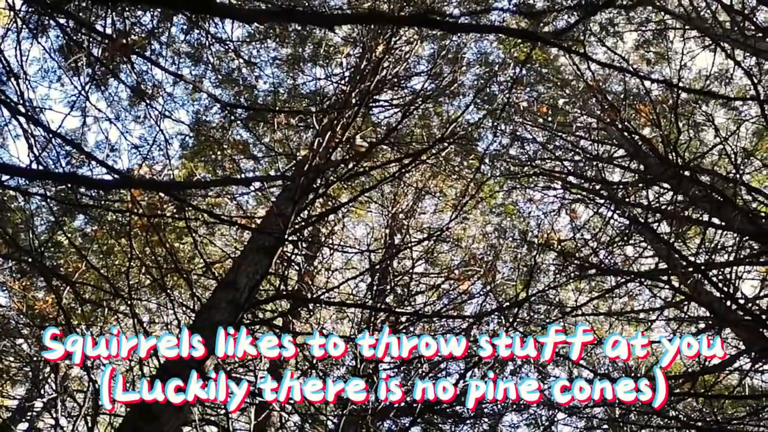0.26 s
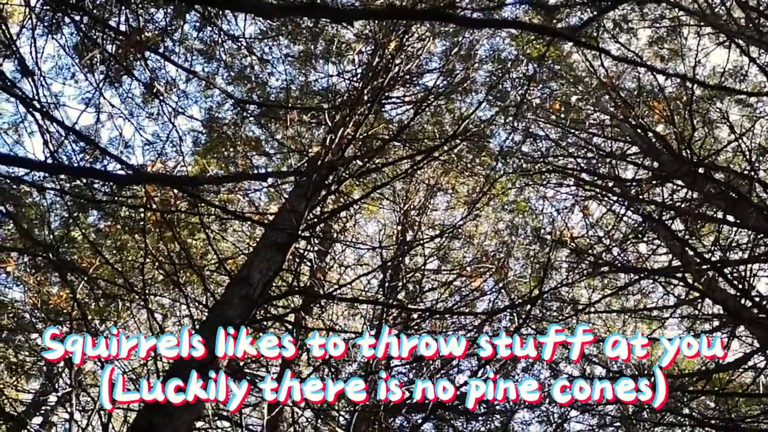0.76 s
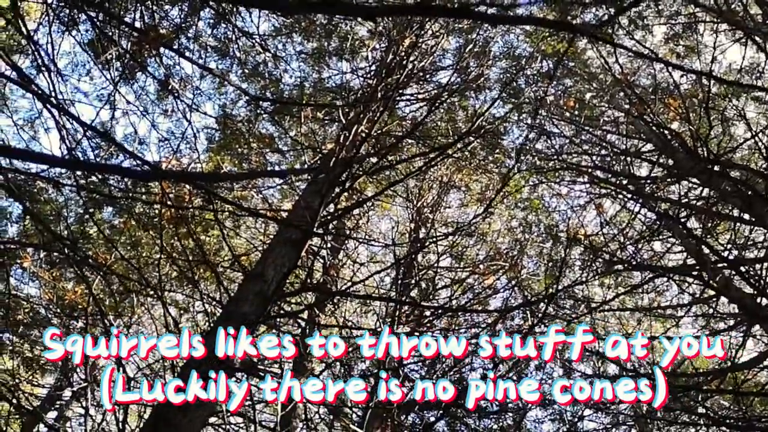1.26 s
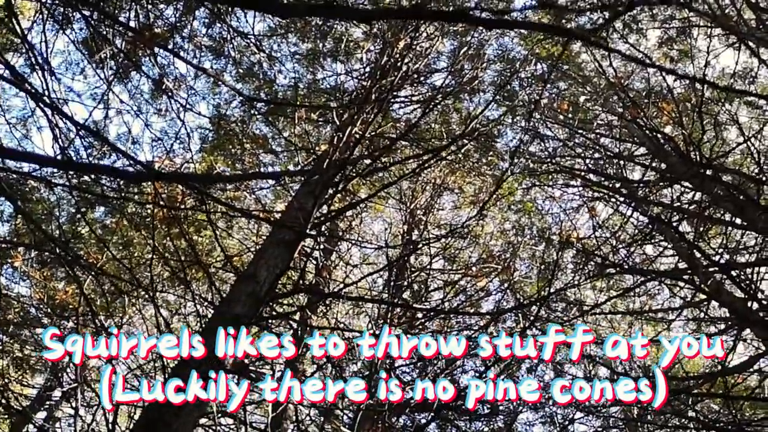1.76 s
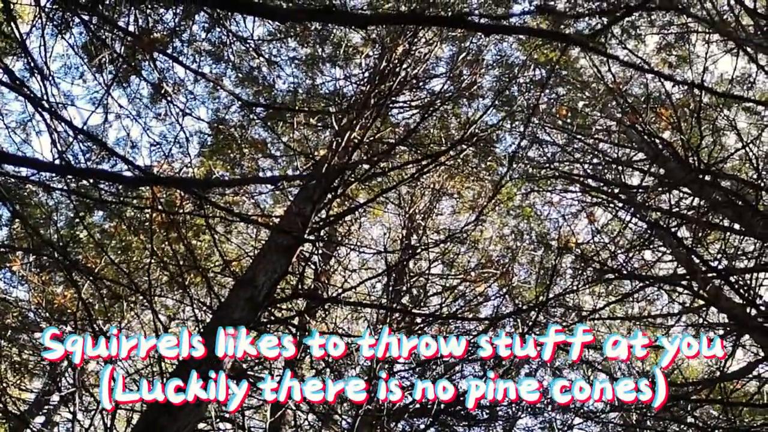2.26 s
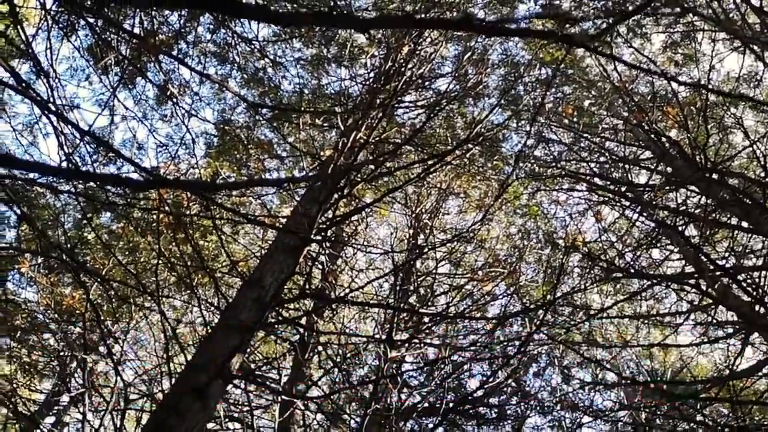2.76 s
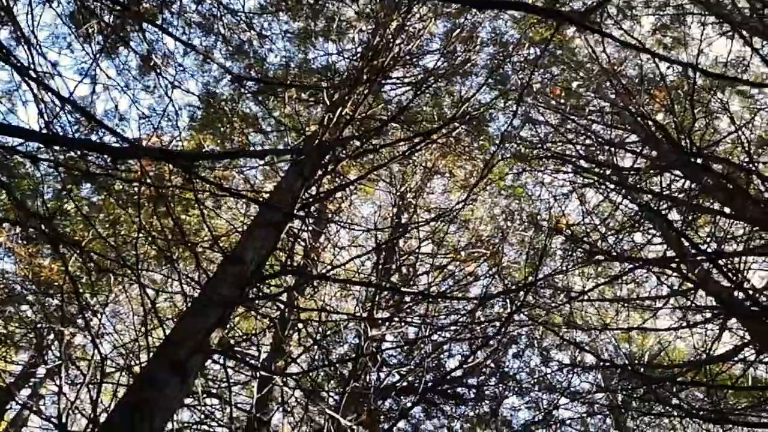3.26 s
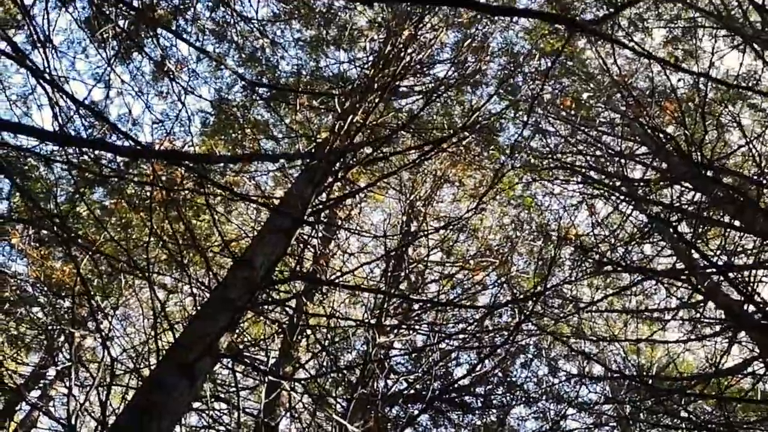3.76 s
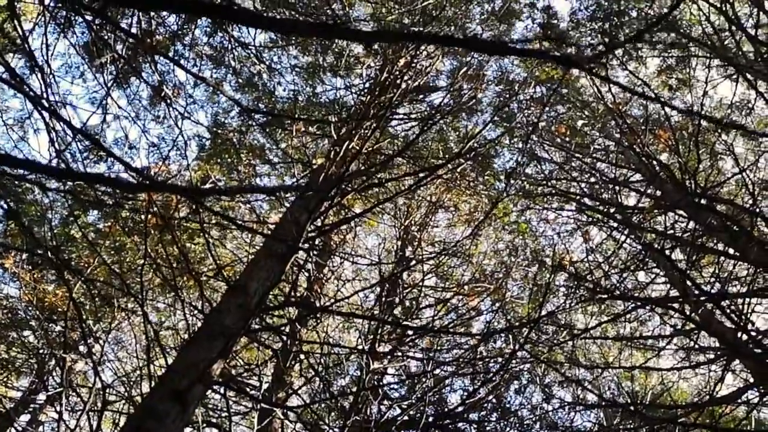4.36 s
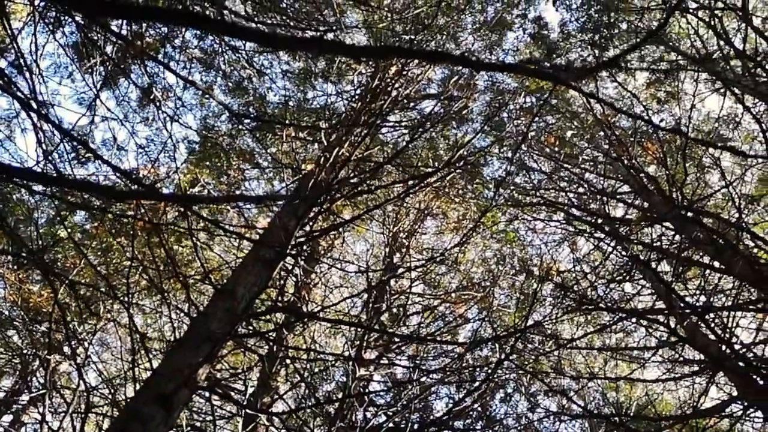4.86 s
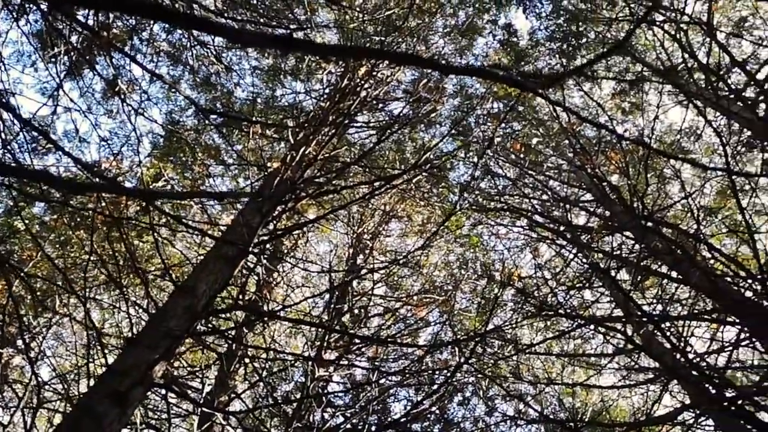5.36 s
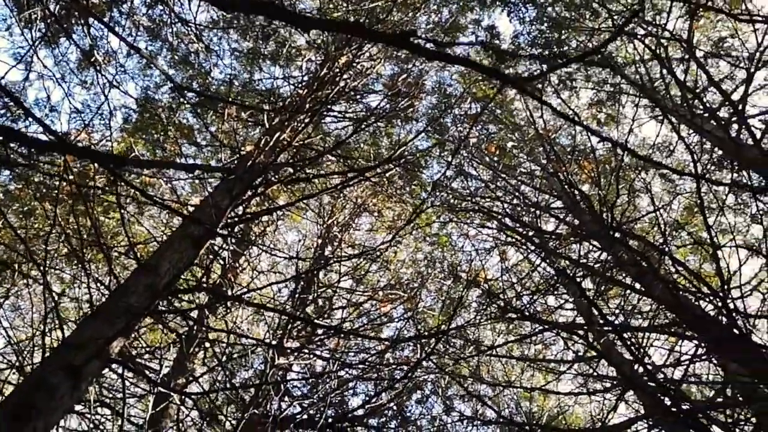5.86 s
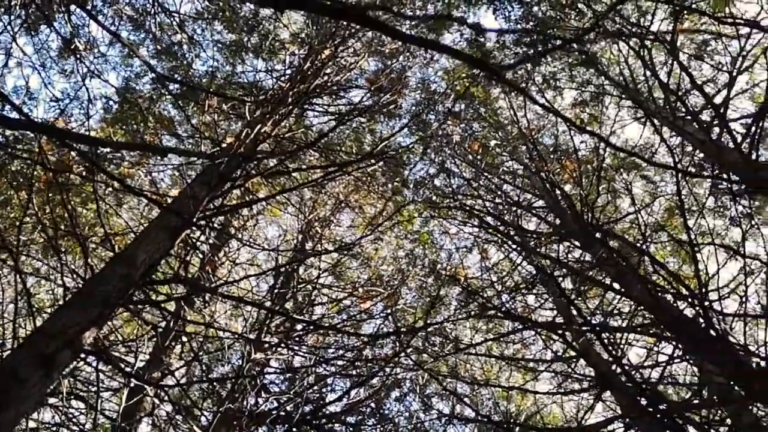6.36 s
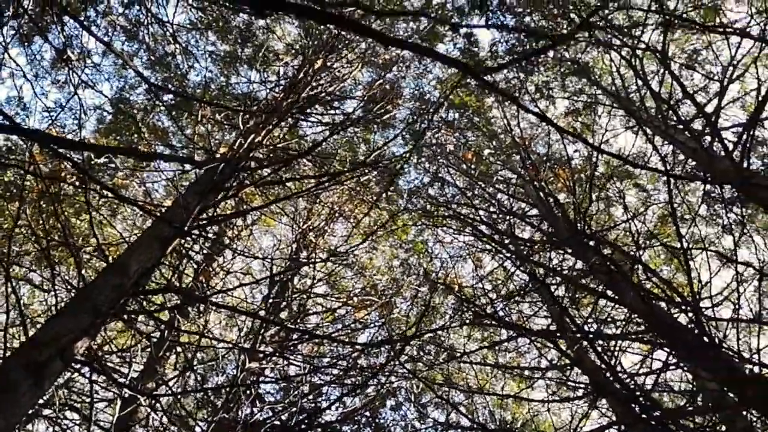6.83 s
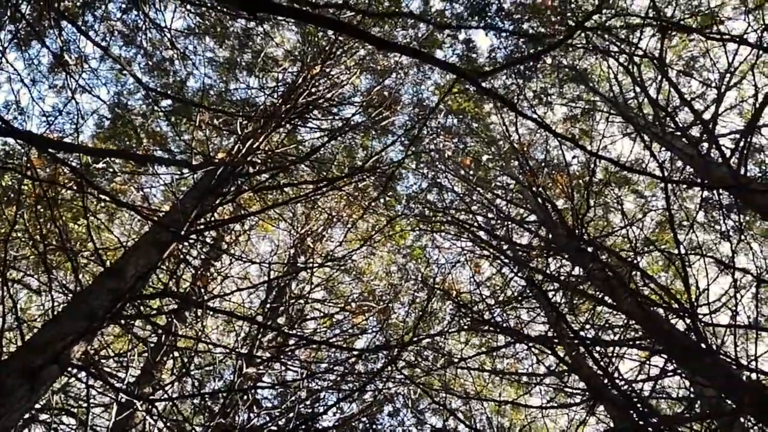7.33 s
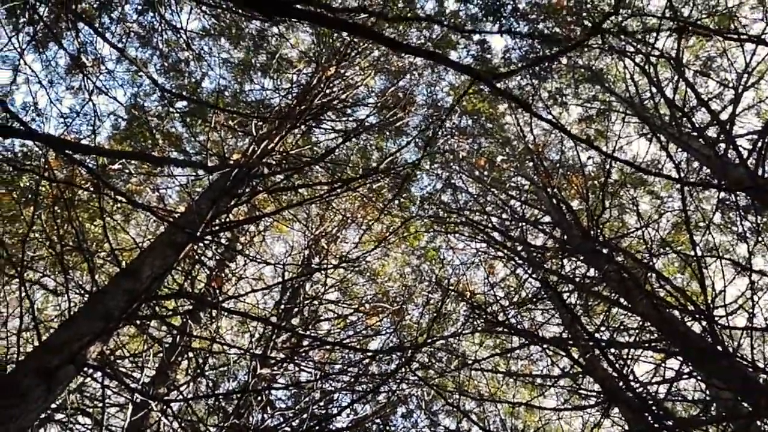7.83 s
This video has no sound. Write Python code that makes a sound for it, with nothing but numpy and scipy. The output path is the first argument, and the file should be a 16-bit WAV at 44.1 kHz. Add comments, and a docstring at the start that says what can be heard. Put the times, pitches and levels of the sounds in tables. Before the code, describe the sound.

A pine forest rushes softly for the whole eight seconds, while wind and fingers on a hand-held microphone make a low, uneven rumble with dull bumps and small knocks. Right at the start a distant squirrel gives a short, high chirp and a nearer one joins in faintly, both on the left. At about 0.5 seconds the near one lets out a brief, trembling squeal that ends in a hiss, the loudest call. The far squirrel chirps on from 1 second, and from about 1.8 seconds the two trade sharp chirps, roughly two to four a second, each flicking up and down in pitch with a short echo among the trees. The rumble swells around 3 seconds and again just after 6. Between about 5.7 and 7.2 seconds a few twigs tick faintly. The near squirrel stops near 6.8 seconds, and the far one chirps last, just before 8.

```python
"""From the start, a pine forest rushes softly while air and fingers make a hand-held camera rumble and
knock. A far squirrel chirps, a near one joins in and, about half a second in, lets out one loud squeal
that ends in a hiss. Then the near one scolds and the far one answers, in short chirps that rise and fall
in pitch. Trunks and treetops scatter each call into a short tail. From about 5.7 s a few twigs tick,
and the far squirrel has the last chirp."""
import sys
import numpy as np
from scipy import signal
from scipy.fft import rfft, irfft, next_fast_len
from scipy.io import wavfile
from scipy.ndimage import map_coordinates

SR = 44100
rng = np.random.default_rng(int(sys.argv[2]) if len(sys.argv) > 2 else 0)


def pcm_store(signal):
    """Save signal as 16-bit PCM."""
    levels = np.round(np.clip(np.atleast_2d(signal), -1, 1) * 32767)
    wavfile.write(sys.argv[1], SR, levels.astype(np.int16).T)


N = 356769
T = np.arange(N) / SR

# Levels in the tables are relative: the functions turn each layer up or down.
# slow changes of the breeze in the treetops (time [s], level [dB])
BREEZE = [(0.0, -50), (2.84, -50), (3.04, -49), (4.03, -50), (7.57, -49), (7.8, -53), (8.09, -52)]
# short gusts (middle [s], half length [s], rise [dB])
GUSTS = [(0.538, 0.11, 3.5), (2.85, 0.092, 2.5), (3.033, 0.067, 2.5), (3.237, 0.08, 3), (3.609, 0.076, 3),
         (4.946, 0.037, 1.5), (5.121, 0.053, 4), (5.328, .045, 4), (5.74, 0.038, 3.5)]
# tone colour of the forest's rush (frequency [Hz], level [dB])
RUSH_COLOUR = [(100, -9), (250, 1.5), (450, -0.5), (650, -2.5), (900, 0.5), (1150, -2.5), (1400, -6),
               (1700, -4.5), (2300, -10), (3200, -20), (5000, -21), (9000, -34)]
# how much of the rush both sides have in common (frequency [Hz], share [0-1])
RUSH_SHARED = [(150, 0.41), (300, 0.56), (550, 0.785), (1000, 0.81), (2000, 0.334), (4000, 0.19)]
# how far the left side's wave runs ahead (frequency [Hz], lead [radians])
RUSH_LEFT_LEAD = [(100, -6), (260, 1.68), (520, 3), (860, 4), (1640, 6.5), (2240, 8.5), (4000, 14.5)]
# how much louder the rush is on the left (frequency [Hz], left minus right [dB])
RUSH_BALANCE = [(200, -5), (380, 3.5), (700, 7), (1290, 10), (2380, 1), (4400, -1)]
# tone colour of the hiss in the pine needles (frequency [Hz], level [dB])
NEEDLE_COLOUR = [(800, -19.5), (2500, 12.5), (4500, 1.5), (6000, 4.5), (7500, 1.5), (9000, -1),
                 (12000, -1.5), (15700, -2)]
# faint far tones (middle [s], half length [s], pitch [Hz], level [dB])
HOOTS = [(1.31, 0.246, 1130, -56), (2.083, 0.115, 1105, -54)]

# strength of the air on the camera (time [s], level [dB])
WIND = [(0, -30), (.12, -24.5), (.33, -30), (.7, -27.5), (1.3, -30), (2.45, -30.5), (2.78, -24),
        (3.3, -21.5), (3.68, -28.5), (3.78, -34), (3.95, -26.5), (5.3, -27), (6.0, -26.5), (6.35, -23.5),
        (7.0, -28), (7.35, -26.5), (7.9, -31)]
# tone colour of the camera's deep sway (frequency [Hz], level [dB])
SWAY_COLOUR = [(5, -13), (12, 8), (23, -1), (57, -6.5), (78, -12), (110, -48), (140, -69.5), (240, -120)]
# tone colour of the higher rumble of the grip (frequency [Hz], level [dB])
GRIP_COLOUR = [(40, -25), (70, 5.5), (110, 0), (160, -11), (250, -22), (400, -32), (700, -44), (1500, -79)]
# jolts of the hand (time [s], level [dB], pitch [Hz])
JOLTS = [(0.246, -17, 93), (1.098, -11.5, 55.5), (2.16, -22.5, 96), (2.73, -15, 86.5), (2.874, -12, 49),
         (4.26, -17.5, 70), (4.89, -22, 90), (5.10, -18, 89.6), (5.29, -15.5, 44.3), (5.733, -12, 48),
         (6.199, -9.5, 41.4), (6.501, -14, 55)]
# fingers knocking on the case (time [s], level [dB])
KNOCKS = [(0.255, -34.5), (1.304, -38), (2.161, -30.5), (2.827, -32), (2.864, -35), (3.208, -38.5),
          (4.033, -34.5), (4.22, -33), (4.368, -37), (4.705, -32.5), (4.884, -31), (5.062, -33),
          (5.109, -30.5), (5.31, -38), (6.06, -34), (6.133, -37.5), (6.347, -34), (6.428, -29)]
# what the case lets through (frequency [Hz], gain [dB])
CASE_FILTER = [(30, -6), (90, 4), (170, 0.5), (300, 4.5), (480, 6), (750, -15.5), (2000, -45)]

# ticking twigs (time [s], level [dB])
TWIG_TICKS = [(5.6555, -47), (5.909, -37), (6.3856, -34), (6.8715, -33.5), (7.0548, -43), (7.1604, -39)]
# tone colour of a tick (frequency [Hz], level [dB])
TWIG_COLOUR = [(1500, -28), (3300, -13), (5000, -16), (7000, -6), (8500, -2), (9600, -16.5), (11000, -24),
               (15000, -29)]

# what a squirrel's throat lets through (frequency [Hz], gain [dB])
THROAT_FILTER = [(2400, -31), (3400, -37), (4300, 0), (5200, 0.5), (6000, -2), (6900, -11.5), (7600, -14),
                 (8700, -22.5), (9700, -24), (10400, -17.5), (11300, -32.5), (12200, -29.5), (13000, -42),
                 (13800, -58), (15500, -60)]
# tone colour of the breath in a chirp (frequency [Hz], level [dB])
BREATH_COLOUR = [(2500, -24), (3800, -16), (5500, 12), (7000, 4.5), (8400, 1.5), (9800, -22), (12000, -6),
                 (15000, -14.5)]
# Below, "pitch" is the voice's strong second harmonic, at twice its lowest tone.
# chirps of the far squirrel (start [s], length [s], top pitch [Hz], level [dB])
FAR_CHIRPS = [(.127, .02, 6570, -29.5), (1.009, 0.027, 6720, -33.5), (1.448, 0.023, 6690, -33.5),
              (1.851, 0.02, 6685, -29.5), (2.823, 0.035, 6940, -28), (3.150, .03, 6720, -29.5),
              (3.611, 0.022, 6660, -29), (3.970, 0.022, 6570, -35), (4.275, 0.026, 6690, -33),
              (4.577, 0.0226, 6385, -36.5), (4.908, 0.02, 5830, -46), (5.240, 0.018, 6370, -39.5),
              (6.012, .021, 6075, -48), (6.383, 0.0125, 6800, -35), (6.436, .026, 6530, -33),
              (7.163, .022, 6100, -42), (7.398, 0.011, 7000, -36.5), (7.529, 0.0265, 6200, -40.5),
              (7.885, .02, 6420, -37)]
# chirps of the near squirrel (start [s], length [s], top pitch [Hz], level [dB], overtones [dB],
# place of the top in the chirp [0-1], flatness of the arch [1 = straight slopes])
NEAR_CHIRPS = [(.222, 0.036, 5800, -41, -5, 0.4, 2), (.343, 0.029, 5380, -44.5, 1, 0.6, 4),
               (1.770, .068, 6474, -30, -3, .5, 2.1), (2.292, 0.061, 6700, -32.5, -7, 0.63, 3),
               (2.351, .027, 6550, -21.5, 3, .14, 1.25), (2.619, .036, 6030, -36, -3, 0.35, 2.5),
               (2.818, 0.035, 5410, -43, 5, 0.5, 4), (3.244, .055, 6016, -30, 1.5, .52, 3.6),
               (3.517, .025, 4933, -47, -5, 0.5, 2), (3.882, 0.0503, 5920, -32.5, -1.5, .43, 2.4),
               (4.115, 0.0427, 5620, -42, 3.5, .5, 2.9), (4.500, .055, 5675, -36.5, 2, .52, 3.2),
               (5.111, 0.0576, 6470, -26, -11, 0.47, 3.1), (5.469, 0.0515, 6160, -28, -8, .56, 3.1),
               (5.771, 0.042, 6060, -28.5, -5, 0.45, 3.1), (6.745, .06, 6520, -27, -8, .42, 2.7)]
# course of the squeal (time [s], pitch [Hz], level [dB])
SQUEAL = [(.416, 5090, -51), (0.420, 5275, -35), (.447, 5400, -23.5), (0.455, 5638, -18),
          (0.474, 5790, -15), (0.488, 5600, -18.5), (0.513, 5660, -13), (0.519, 5500, -13.5),
          (0.523, 5020, -30), (.528, 4240, -45)]
# the hiss that ends the squeal (time [s], level [dB])
HISS_LEVEL = [(.52, -74), (.531, -47), (.541, -24), (.575, -32.5), (.6, -28), (.64, -40.5), (.72, -58.5),
              (.8, -95)]
# tone colour of that hiss (frequency [Hz], level [dB])
HISS_COLOUR = [(2000, -12), (2800, -2), (4000, -15.5), (6800, -5), (7800, 9), (8800, 2.5), (9800, -15.5),
               (12000, -21.5), (15500, -22.5)]


def amp(db):
    """Turn decibels into a number to multiply by."""
    return 10 ** (np.asarray(db) / 20)


def unit(x):
    """Scale a sound to an average strength (rms) of 1."""
    return x / np.sqrt(np.mean(x ** 2) + 1e-20)


def look_up(table, hz):
    """Read between the rows of a (frequency, value) table, with octaves evenly spaced."""
    frequencies, values = np.transpose(table)
    return np.interp(np.log(hz + 1), np.log(frequencies + 1), values)


def curves(table):
    """Join timed rows with straight lines: one curve for each column after the time."""
    times, *columns = np.transpose(table)
    return [np.interp(T, times, column) for column in columns]


def wobble(rate):
    """A smooth curve through `rate` random values a second."""
    return map_coordinates(rng.standard_normal(int(N * rate / SR) + 4), [T * rate])


def filtered(x, response):
    """Multiply each frequency in a sound by response(hz)."""
    size = next_fast_len(N + SR // 2)
    return irfft(rfft(x, size) * response(np.fft.rfftfreq(size, 1 / SR)), size)[..., :N]


def noise(colour):
    """Noise of strength 1 with the given tone colour."""
    return unit(filtered(rng.standard_normal(N), lambda hz: amp(look_up(colour, hz))))


def fuzzy_tone(hz, width_hz):
    """A tone of strength 1, blurred by random wobbles."""
    phase = 2 * np.pi * hz * T
    return unit(wobble(width_hz) * np.sin(phase) + wobble(width_hz) * np.cos(phase))


def add(track, start, sound):
    """Mix a sound into a track, `start` seconds in."""
    i = max(round(start * SR), 0)
    track[..., i:i + sound.shape[-1]] += sound[..., :N - i]


def gusts():
    """The rise in dB from all gusts; each swells and fades like a bell curve."""
    return sum(db * np.exp(-((T - middle) / half) ** 2) for middle, half, db in GUSTS)


def forest():
    """The breeze makes a distant rush from the left and a fine hiss in the needles."""
    def shared_part(hz):
        right_delay = np.exp(-1j * look_up(RUSH_LEFT_LEAD, hz))
        return np.sqrt(look_up(RUSH_SHARED, hz)) * np.array([np.ones_like(hz), right_delay])

    common, left, right = (noise(RUSH_COLOUR) for _ in range(3))
    rush = filtered(common, shared_part)
    rush += filtered(np.array([left, right]), lambda hz: np.sqrt(1 - look_up(RUSH_SHARED, hz)))
    rush = unit(filtered(rush, lambda hz: amp(np.outer([.5, -.5], look_up(RUSH_BALANCE, hz)))))
    needles = unit(np.array([noise(NEEDLE_COLOUR), noise(NEEDLE_COLOUR)])) * amp([[.5], [-.5]])
    breeze_db = curves(BREEZE)[0] + gusts()
    return rush * amp(breeze_db + 4.5 + 0.71 * wobble(9)) + needles * amp(breeze_db - 8.5)


def far_hoots():
    """Two faint tones swell and fade, far off to the left."""
    hoots = sum(amp(db) * np.exp(-((T - middle) / half) ** 2) * fuzzy_tone(hz, width_hz=57)
                for middle, half, hz, db in HOOTS)
    return hoots * amp([[3], [-5]])  # left, right


def camera_rumble():
    """Air and hand shake the camera: a lumpy rumble that grows with the wind."""
    lumps_per_s = 18
    wind_db = curves(WIND)[0] + 1.9 * gusts()
    sway = amp(wind_db + 3 + 1.5 * wobble(lumps_per_s)) * noise(SWAY_COLOUR)
    grip_db = wind_db.mean() - 14 + 0.78 * (wind_db - wind_db.mean())  # follows the wind only partly
    grip = noise(GRIP_COLOUR) + amp(-6.5) * np.array([noise(GRIP_COLOUR), noise(GRIP_COLOUR)])
    return sway + amp(grip_db + 3 * wobble(lumps_per_s)) * grip


def thuds(table, fade_s, attack_s):
    """Low tones that die within a few swings, dropping 60 dB in fade_s."""
    out, t = np.zeros(N), np.arange(SR // 6) / SR
    onset = 1 - np.exp(-t / attack_s)
    for start, db, hz in table:
        add(out, start, onset * amp(db - 60 * t / fade_s) * np.sin(2 * np.pi * hz * t))
    return out


def hand_bumps():
    """The hand jolts the camera, and finger knocks make its case ring low and briefly."""
    jolts = thuds(JOLTS, fade_s=0.12, attack_s=0.0029)
    case_hz = 165
    knocks = thuds([(start, db + 6.5, case_hz) for start, db in KNOCKS], fade_s=0.03, attack_s=0.00039)
    return jolts + filtered(knocks, lambda hz: amp(look_up(CASE_FILTER, hz)))


def among_trees(sound, early_db, tail_db, fade_s, right_db):
    """A sound arrives directly, as quick echoes off branches and as a soft tail from the treetops."""
    t = np.arange(SR // 2) / SR
    shape = (2, len(t))
    echo_here = (rng.random(shape) < .05) & (t > .003)
    branches = rng.standard_normal(shape) * echo_here * amp(-60 * t / 0.11)
    treetops = rng.standard_normal(shape) * amp(-60 * t / fade_s) * (1 - np.exp(-t / 0.014))
    paths = amp(early_db) * branches / np.linalg.norm(branches[0])
    paths += amp(tail_db) * treetops / np.linalg.norm(treetops[0])
    paths[0, 0] += 1  # the direct sound reaches the left first
    paths[1, 25] += .7  # and the right 25 samples later
    balance = amp([[0], [right_db]])  # the right microphone faces away
    return signal.fftconvolve(sound[None], paths, axes=1) * balance


def twigs():
    """Twigs tick up in the branches, each a tiny puff of noise that dies at once."""
    loudness, t = np.zeros(N), np.arange(SR // 8) / SR
    fade_s = 0.0206
    for start, db in TWIG_TICKS:
        add(loudness, start, amp(db - 60 * t / fade_s) * (1 - np.exp(-t * 25 / fade_s)))
    ticks = loudness * noise(TWIG_COLOUR)
    return among_trees(ticks, early_db=-3.5, tail_db=-6.5, fade_s=.2, right_db=-19.5)[:, :N]


def voice(hz, overtone_db, jitter, lowest_db):
    """Five harmonics shaped by the throat, the second at hz; jitter shakes the pitch to make it rough."""
    rough_hz = hz * (1 + jitter * wobble(1128)[:len(hz)])
    phase = np.pi * np.cumsum(rough_hz) / SR  # of the lowest tone, at half of hz
    levels_db = [lowest_db, 0, overtone_db, overtone_db, overtone_db]
    return np.sqrt(2) * sum(amp(db + look_up(THROAT_FILTER, hz * k / 2)) * np.sin(k * phase)
                            for k, db in enumerate(levels_db, 1))


def chirps(table, gain_db, breath_db, rise_hz_per_s, fall_hz_per_s, jitter):
    """Give (start, sound) for each chirp: the pitch flicks up and drops away over a puff of breath."""
    air = noise(BREATH_COLOUR)
    for start, length, top_hz, db, overtone_db, top_at, flatness in table:
        progress = np.linspace(0, 1, int(length * SR))
        before_top = np.clip(1 - progress / top_at, 0, 1)
        after_top = np.clip((progress - top_at) / (1 - top_at), 0, 1)
        climb_hz = rise_hz_per_s * length * top_at
        drop_hz = fall_hz_per_s * length * (1 - top_at)
        hz = top_hz - climb_hz * before_top ** flatness - drop_hz * after_top ** flatness
        arch = np.abs(np.cos(np.pi / 2 * (before_top + after_top)))  # loudest at the top
        flutter = amp(2.5 * wobble(200)[:len(hz)])
        tone = arch ** .55 * flutter * voice(hz, overtone_db, jitter, lowest_db=-2)
        breath = amp(breath_db) * arch ** 0.12 * air[int(start * SR):][:len(hz)]
        yield start, amp(db + gain_db) * (tone + breath)


def far_squirrel():
    """The far squirrel's quick answers arrive mostly as echoes from the trees."""
    out = np.zeros((2, N))
    overtone_db, top_at, flatness = -15, 0.41, 1.92
    table = [(*row, overtone_db, top_at, flatness) for row in FAR_CHIRPS]
    for start, call in chirps(table, gain_db=-5, breath_db=-21,
                              rise_hz_per_s=67000, fall_hz_per_s=61000, jitter=.022):
        add(out, start, among_trees(call, early_db=-1, tail_db=0, fade_s=0.32, right_db=-23))
    return out


def near_squirrel():
    """The near squirrel's scolding chirps arrive mostly directly."""
    out = np.zeros((2, N))
    for start, call in chirps(NEAR_CHIRPS, gain_db=-1, breath_db=-23,
                              rise_hz_per_s=32000, fall_hz_per_s=37200, jitter=.013):
        add(out, start, among_trees(call, early_db=-7, tail_db=-10, fade_s=.3, right_db=-23))
    return out


def squeal():
    """The near squirrel gives one longer, loud, trembling call that ends in a hiss."""
    out = np.zeros((2, N))
    start, end = SQUEAL[0][0], SQUEAL[-1][0]
    hz, db = [curve[int(start * SR):int(end * SR)] for curve in curves(SQUEAL)]
    tremble = 1 + .016 * wobble(380)[:len(hz)]
    flutter_db = 2 * wobble(259)[:len(hz)]
    call = amp(db + flutter_db) * voice(hz * tremble, overtone_db=-2.5, jitter=0.0045, lowest_db=8.5)
    add(out, start, among_trees(call, early_db=-6, tail_db=-11, fade_s=.33, right_db=-22))
    hiss = np.array([noise(HISS_COLOUR), amp(-31.5) * noise(HISS_COLOUR)])  # almost all on the left
    return out + hiss * amp(curves(HISS_LEVEL)[0] - 5.5)


def scene():
    """The forest and the hand on the camera, with both squirrels on top."""
    background = forest() + far_hoots() + camera_rumble() + hand_bumps() + twigs()
    return background + far_squirrel() + near_squirrel() + squeal()


def record(dry):
    """The camera adds a thin whine and cuts off the very highest treble."""
    whine = fuzzy_tone(hz=7860, width_hz=300) * amp([[-72], [-81]])
    return filtered(dry + whine, lambda hz: hz < 15780)


dry = scene()
out = record(dry)
pcm_store(out)
```